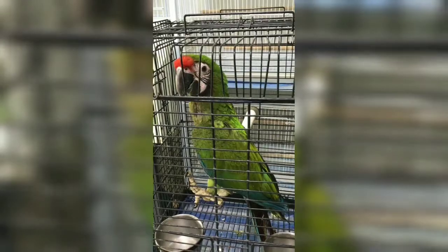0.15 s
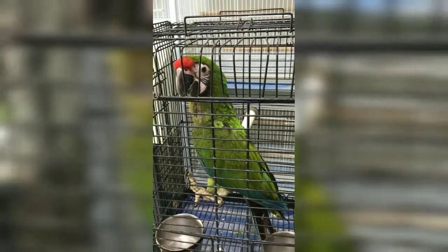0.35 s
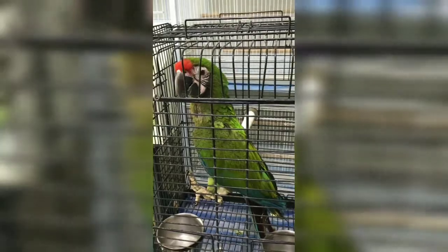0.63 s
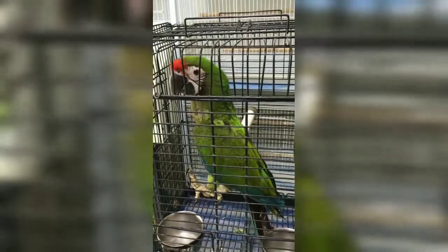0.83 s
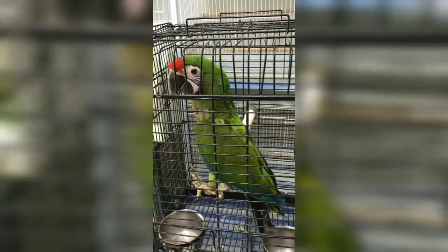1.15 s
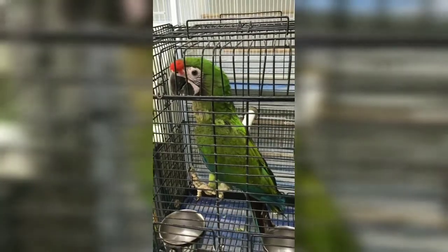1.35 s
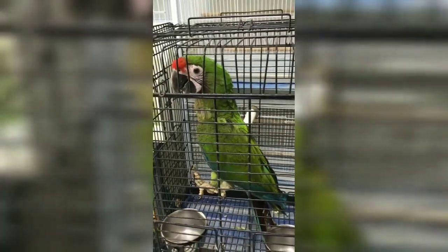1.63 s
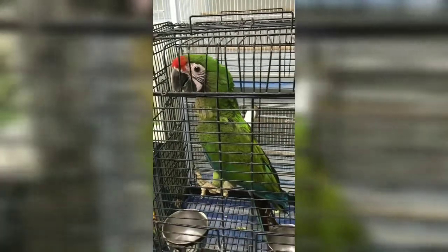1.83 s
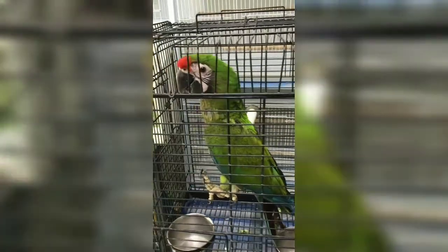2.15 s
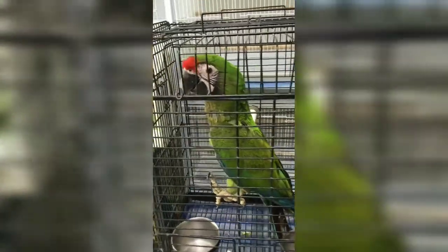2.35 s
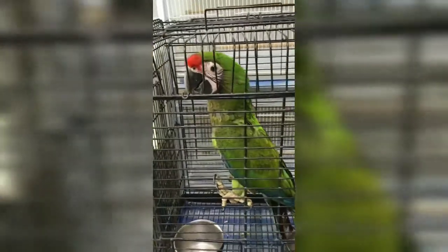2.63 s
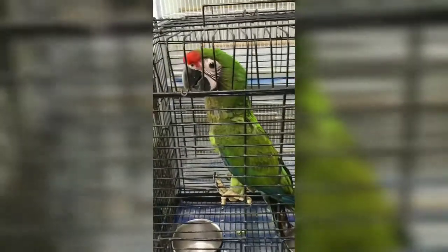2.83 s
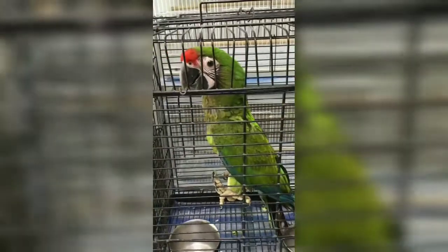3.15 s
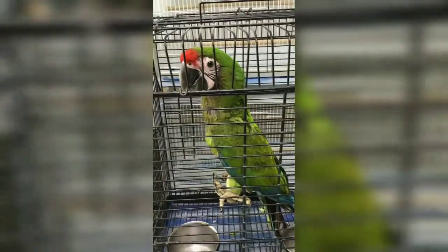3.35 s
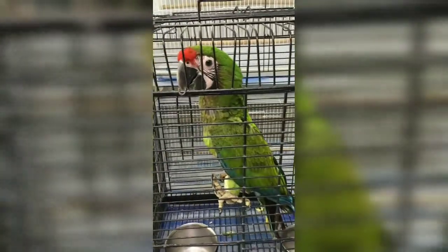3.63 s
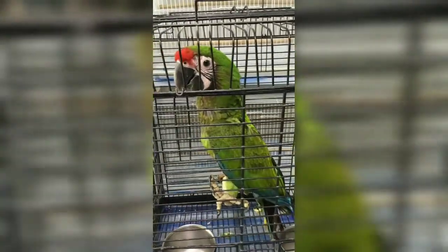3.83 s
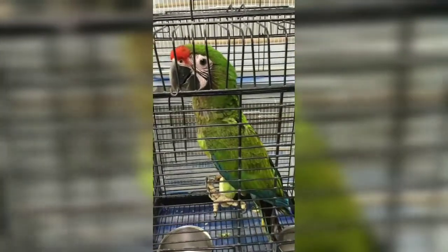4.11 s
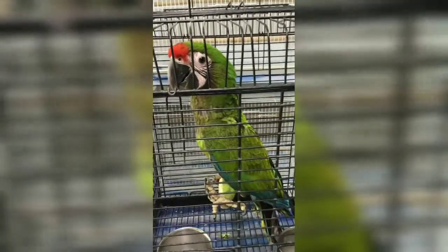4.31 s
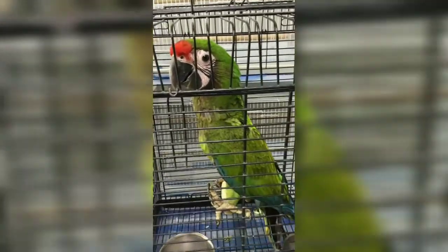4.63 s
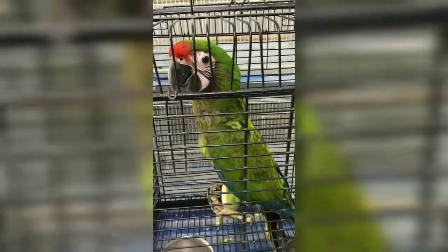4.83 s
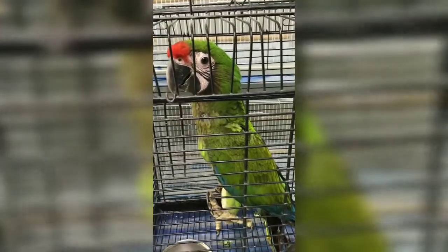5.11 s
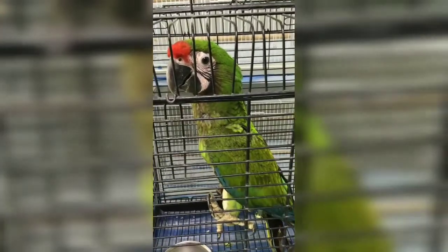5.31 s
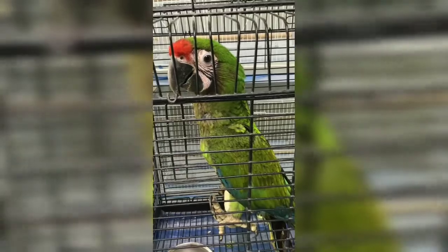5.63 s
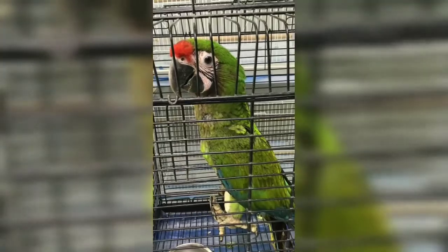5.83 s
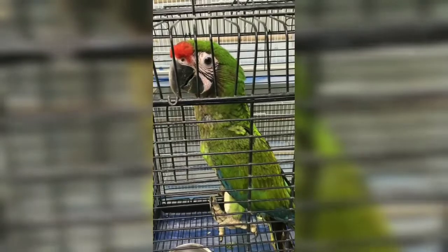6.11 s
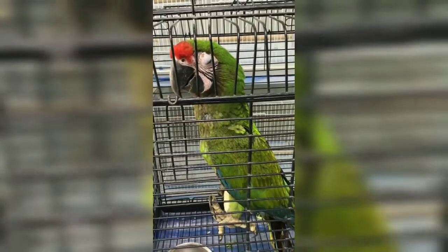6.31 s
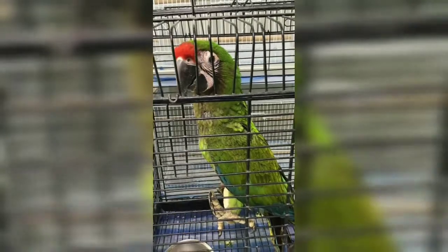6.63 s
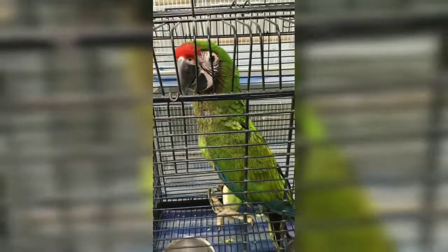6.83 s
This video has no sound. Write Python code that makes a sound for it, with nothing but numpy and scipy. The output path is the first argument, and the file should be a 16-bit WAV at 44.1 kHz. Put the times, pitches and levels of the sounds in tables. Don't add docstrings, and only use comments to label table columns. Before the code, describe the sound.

Piercing, raspy parrot screeches overlap with rough lower squawks in an echoing aviary room, with beating motor hum and soft bumps against the microphone.

```python
import sys
import numpy as np
from scipy import signal
from scipy.fft import rfft, irfft, next_fast_len
from scipy.io import wavfile
from scipy.ndimage import uniform_filter1d, map_coordinates

SR = 44100
rng = np.random.default_rng(int(sys.argv[2]) if len(sys.argv) > 2 else 0)


def rack_gain(trim_db):
    fader = np.asarray(trim_db, float)
    return 10 ** (fader / 20)


def wav_record(signal):
    frames = np.transpose(np.atleast_2d(signal))
    bounded = np.clip(frames, -1, 1)
    quanta = np.round(bounded * 32767).astype(np.int16)
    wavfile.write(sys.argv[1], SR, quanta)


N = 306936


def unit(x):
    return x / np.sqrt(np.mean(x ** 2) + 1e-20)


def curves(rows):
    seconds, *columns = np.transpose(rows)
    return [np.interp(np.arange(N) / SR, seconds, column) for column in columns]


def along(points, hz):
    point_hz, value = np.transpose(points)
    return np.interp(np.log(hz + 1), np.log(point_hz + 1), value)


def wobble(rate):
    coarse = np.arange(0, N + 16, 8)
    knots = rng.standard_normal(int(N * rate / SR) + 4)
    return np.interp(np.arange(N), coarse, map_coordinates(knots, [coarse * rate / SR]))


def coloured(x, spectrum):
    size = next_fast_len(len(x) + 8192)
    gain = rack_gain(along(spectrum, np.fft.rfftfreq(size, 1 / SR)))
    return unit(irfft(rfft(x, size) * gain, size)[:len(x)])


def mixed(clear, breath, share):
    share = np.clip(share, 0, 1)
    return np.sqrt(1 - share) * clear + np.sqrt(share) * breath


# multiple of the turning rate, first motor in dB, second motor in dB.
HUM = [(1, -44, -47.5), (2, -59.5, -51.5), (3, -58, -113), (4, -69, -86.5), (5, -76, -76)]
# pitch in Hz, level in dB, two limits
# in seconds (from, to).
WHINE = [(12575, -68, 6.265, 5.9), (13954, -87, 7.8, 4.8)]
# frequency in Hz, density in dB per Hz.
AIR = [(20, -55), (60, -5.5), (100, 7.5), (150, -7.5), (300, -9.5), (700, -10), (1400, -14), (2500, -7),
       (6000, -14), (10000, -56), (15600, -28)]


def fans():
    t = np.arange(N) / SR
    hz, beat_hz, together_s = 97.5, .518, 2.1
    spin = 2 * np.pi * hz * t + 0.43 * wobble(12)
    slip = 2 * np.pi * beat_hz * (t - together_s)
    hum = np.zeros(N)
    for k, first_db, second_db in HUM:
        pair = rack_gain(first_db) * np.sin(k * spin) + rack_gain(second_db) * np.sin(k * (spin - slip))
        hum += rack_gain(0.13 * wobble(1.81)) * pair * np.sqrt(2)
    whine = np.zeros(N)
    for whine_hz, db, from_s, to_s in WHINE:
        tone = np.sin(2 * np.pi * whine_hz * t) * (t > from_s) * (t < to_s)
        whine += rack_gain(db + 3.6 * wobble(9)) * tone
    gusts_db = 1.6 * wobble(5)
    return hum + whine + rack_gain(-45.5 + gusts_db) * coloured(rng.standard_normal(N), AIR)


# centre in seconds, level in dB, pitch in Hz, half length in seconds.
PEEPS = [
    (6.45, -38.5, 1010, 0.012),
    (6.494, -45, 1580, 0.052),
]


def peeps():
    t = np.arange(N) / SR
    out = np.zeros(N)
    for s, db, hz, half_s in PEEPS:
        out += rack_gain(db) * np.sin(2 * np.pi * hz * t) * np.exp(-2 * ((t - s) / half_s) ** 2)
    return out


# centre in seconds, level in dB, half length in seconds, low edge in Hz, top edge in Hz.
BUMPS = [(1.773, -39.5, 0.041, 70.2, 510), (1.913, -50, 0.1, 60, 201), (2.05, -29.5, 0.017, 44.46, 475),
         (2.143, -21.5, 0.033, 49.73, 490), (2.19, -28, 0.023, 45.7, 303),
         (3.089, -36.5, 0.1, 120.2, 552.2), (3.25, -43.5, 0.24, 150, 682), (3.602, -50, 0.086, 295.6, 697),
         (4.052, -41, 0.06, 69.8, 347), (5.048, -48, 0.11, 51.5, 202.6),
         (5.308, -33.5, 0.024, 60.16, 279.8), (5.702, -50, .08, 150, 349)]


def bumps():
    out = np.zeros(N)
    t = np.arange(-SR // 4, SR // 4) / SR
    for s, db, half_s, low_hz, top_hz in BUMPS:
        thud = [(low_hz / 2.5, -34), (low_hz, 0), (top_hz, -6), (top_hz * 3.8, -40)]
        lump = coloured(rng.standard_normal(len(t)), thud)
        out[round(s * SR) - SR // 4:][:len(t)] += rack_gain(db) * lump * np.exp(-2 * (t / half_s) ** 2)
    return out


# frequency in Hz, time to fall 60 dB in seconds.
ROOM = [(300, 0.3), (2000, 0.54), (5000, 0.49), (8000, 0.062), (15000, 0.15)]


def room(x):
    hz, t, z = signal.stft(rng.standard_normal(SR), SR, nperseg=256)
    fading = z * rack_gain(-60 * t / along(ROOM, hz)[:, None])
    tail = signal.istft(fading, SR, nperseg=256)[1]
    return signal.fftconvolve(np.pad(x, (350, 0)), tail / np.linalg.norm(tail))[:N]


def call_levels(calls, build_db, drop_db, knee_db, linger_db):
    attack_s, attack_db = .04, 15
    t = np.arange(0, N + 64, 64) / SR
    s, held_s, db = np.transpose(calls)[:3, :, None]
    after = np.maximum(t - s - held_s, 0)
    jump_db = attack_db * np.maximum(1 - (t - s) / attack_s, 0) ** 2
    rise_db = build_db * np.maximum(s + held_s - t, 0)
    fall_db = np.minimum(drop_db * after, knee_db + linger_db * after)
    below_db = jump_db + rise_db + fall_db
    return np.interp(np.arange(N) / SR, t, np.max(db - below_db, axis=0))


# start in seconds, held time in seconds, level in dB.
RASPS = [(.25, 0.14, -52), (.47, 0.11, -52.5), (.6, 0.26, -34.5), (.775, 0.15, -31), (1.015, 0.066, -34.5),
         (1.285, 0.1, -35), (1.47, 0.071, -36.5), (1.755, 0.11, -27.5), (1.96, 0.2, -33),
         (2.28, 0.15, -39.5), (2.55, .1, -35.5), (2.72, 0.088, -35.5), (2.945, 0.088, -30),
         (3.12, 0.13, -35), (3.39, 0.026, -48.5), (3.715, 0.2, -32), (3.97, 0.13, -35),
         (4.385, 0.086, -34.5), (4.53, .06, -26.5), (4.68, 0.068, -35), (4.925, 0.2, -26.5),
         (5.25, 0.12, -35), (5.51, 0.21, -32.5), (5.99, 0.24, -36), (6.265, 0.04, -32.5),
         (6.515, 0.14, -31), (6.885, 0.066, -39)]
# frequency in Hz, density in dB per Hz.
RASP = [(5200, -16.5), (6200, 5), (6500, -9), (6770, -7), (7250, 1), (7640, 2.5), (8700, -1.5), (9000, -3),
        (11800, -14.5), (12200, -20), (13900, -20), (15600, -27.5)]


def rasps(gap_db):
    level_db = call_levels(RASPS, build_db=33, drop_db=119, knee_db=6, linger_db=66)
    flutter = rack_gain(0.91 * wobble(150) + 0.96 * wobble(10))
    return rack_gain(level_db + gap_db) * coloured(rng.standard_normal(N) * flutter, RASP)


# start in seconds, held time in seconds, level in dB, top pitch in Hz, end pitch in Hz.
PURE_CALLS = [
    (.26, 0.039, -22, 1823, 1835),
]
CLEAR_CALLS = [(1.015, 0.066, -19, 1835, 1836), (1.285, 0.12, -18, 1969, 1975),
               (3.22, 0.057, -20.5, 2110, 2110), (4.55, .05, -18.5, 2098, 2110),
               (5.218, 0.18, -21, 2024, 2030)]
SHRILL_CALLS = [(.775, 0.12, -19, 2083, 1921), (1.755, 0.072, -14.5, 2140, 1975),
                (2.74, 0.067, -19.5, 2043, 1940), (2.945, 0.1, -18, 2095, 2031),
                (3.715, 0.17, -15, 2174, 2162), (4, 0.1, -21, 2081, 2006), (4.219, .05, -26, 2137, 2164),
                (4.925, 0.16, -13.5, 2200, 2059), (5.509, .1, -22, 2164, 2035),
                (6, 0.13, -17.5, 2103, 2149), (6.25, 0.05, -20.5, 2112, 1615),
                (6.51, 0.14, -16.5, 2283, 2163), (6.875, 0.074, -24.5, 1885, 2000)]
HOARSE_CALLS = [(.52, 0.052, -42, 1699, 1700), (.6, 0.14, -26, 1950, 1866),
                (2.259, 0.17, -26.5, 1948, 1900), (2.42, 0.13, -22.5, 1927, 1891),
                (2.6, 0.21, -21, 2061, 2046), (3.1, 0.12, -18.5, 2101, 2135),
                (4.385, 0.18, -22, 2170, 2170), (5.72, 0.11, -31.5, 1974, 1949),
                (6.14, 0.098, -22, 2200, 2180), (6.43, 0.11, -23.5, 2183, 2074)]
RAGGED_CALLS = [(2, 0.089, -23.5, 2180, 2119), (4.68, .12, -27.5, 1786, 1744)]
SHAKE = [.13, .18, .32, .5, .9]
SCOOP = [.95, .91, .94, .95, .98]
HALF_DB = [-23, -3, -7, -10, -3.5]
LOW_DB = [13.6, 9.2, 11.5, 14.5, 8.8]
HIGH_DB = [12.7, 14.3, 12.2, 16.3, 17.2]
BREATH = [.03, .05, .08, .15, .25]


def note_curves():
    kinds = [PURE_CALLS, CLEAR_CALLS, SHRILL_CALLS, HOARSE_CALLS, RAGGED_CALLS]
    calls = sorted((*call, kind) for kind, table in enumerate(kinds) for call in table)
    followers = calls[1:] + [(N / SR + 1, 0)]
    rows = []
    for (s, _, _, top_hz, end_hz, kind), (end, *_, next_kind) in zip(calls, followers):
        colour = [table[kind] for table in (SHAKE, HALF_DB, LOW_DB, HIGH_DB, BREATH)]
        gap_db = -70 * (1 - SCOOP[next_kind])
        rows.append((s, top_hz * SCOOP[kind], 0, *colour))
        rows.append((s + .035, top_hz, 0, *colour))
        rows.append((end - .03, end_hz, 0, *colour))
        rows.append((end - .004, end_hz, gap_db, *colour))
    return curves(rows) + [call_levels(calls, build_db=37, drop_db=168, knee_db=12, linger_db=79)]


# multiple of the pitch, level in dB.
SCREECH_PARTS = [(1, -11.5), (1.5, -9), (2, -2), (2.5, -12), (3, -14), (3.5, -25.5), (4, -27.5), (4.5, -19),
                 (5, -28), (6, -35), (7, -36)]
# frequency in Hz, density in dB per Hz.
SMALL_THROAT = [(900, -76), (1500, -15), (2050, -5.5), (2650, -9), (3200, 3), (4200, 1.5), (5200, 5.5),
                (6100, -11), (6600, -48), (8000, -50)]


def screeches(hz, gap_db, shake, half_db, low_db, high_db, breath, voice_db):
    shaken_hz = hz * (1 + shake * (.05 * wobble(240) + .03 * wobble(45)))
    turn = 2 * np.pi * np.cumsum(shaken_hz) / SR
    whistle = np.zeros(N)
    for k, db in SCREECH_PARTS:
        lift_db = half_db * (k % 1 > 0) + (low_db - 12) * (k < 1.7) + (high_db - 12) * (k > 2.2)
        line = rack_gain(db + lift_db + (3.0 + 3.0 * shake) * wobble(150))
        slip = 2.6 * shake * wobble(330)
        whistle += line * np.sin(k * turn + slip)
    flutter = rack_gain(2.3 * wobble(130) + 0.82 * wobble(18))
    air = coloured(rng.standard_normal(N), SMALL_THROAT)
    return rack_gain(voice_db + gap_db) * unit(flutter) * mixed(whistle, air, breath)


def small_parrots():
    hz, gap_db, *voice = note_curves()
    return screeches(hz, gap_db, *voice), rasps(gap_db)


# full voice from in seconds, held time in seconds, level in dB, pitch in Hz,
# breath share from 0 to 1.
SQUAWKS = [(.1, .12, -46.5, 488.4, 0.08), (1.6, 0.041, -46, 440.5, 0.82), (1.745, .035, -32.5, 375.8, 0.68),
           (1.975, 0.049, -27.5, 600, 0.44), (2.06, 0.092, -27, 519.8, .3),
           (3.04, 0.049, -37.5, 612.3, 0.98), (3.66, .04, -39, 538.5, 1), (3.81, 0.057, -29.5, 549.5, 0.86),
           (3.92, .13, -25.5, 599.5, 0.49), (4.1, 0.058, -30, 488.8, .5), (4.26, 0.042, -36, 516.5, 0.8),
           (4.47, 0.049, -36, 533, 0.71), (5.12, .04, -29, 519.5, 0.56), (5.2, .11, -23.5, 651, .48),
           (5.37, 0.058, -30, 455.8, 0.77), (5.59, .11, -25.5, 618.6, .52)]


def squawk_curves():
    swell_db_per_s, fade_db_per_s, quiet_db = 110, 120, -69
    sag_per_s, wander = 1.1, .1
    t = np.arange(0, N + 64, 64) / SR
    s, held_s, db, hz, breath = np.transpose(SQUAWKS)[:, :, None]
    below_db = swell_db_per_s * np.maximum(s - t, 0) + fade_db_per_s * np.maximum(t - s - held_s, 0)
    pitch = hz * (1 - sag_per_s * breath * np.clip(t - s - held_s / 2, -.2, .2))
    breath = np.clip(breath + .012 * below_db, 0, 1)
    open_db = 22 - 16.5 * breath - .12 * np.minimum(below_db, 20)
    lead = np.argmax(db - below_db, axis=0), np.arange(len(t))
    level_db = np.maximum((db - below_db)[lead], quiet_db)
    led = uniform_filter1d([pitch[lead], level_db, open_db[lead], breath[lead]], size=9, axis=1)
    hz, level_db, open_db, breath = curves(np.transpose([t, *led]))
    hz = hz * (1 + wander * np.minimum(breath, .55) * wobble(18))
    return hz, level_db, open_db, breath


# frequency in Hz, density in dB per Hz.
BIG_THROAT = [(180, -28), (300, -12.5), (489, -10.5), (625, -6), (819, -6), (955, -5.5), (1130, -5.5),
              (1910, -0.5), (3600, -6.5), (4140, -9), (6500, -20), (8450, -85), (14300, -120)]


def squawks():
    hz, level_db, open_db, breath = squawk_curves()
    turn = 2 * np.pi * np.cumsum(hz * (1 + .028 * wobble(150) + .025 * wobble(28))) / SR
    effort = np.clip((level_db + 48) / 18, 0, 1)
    pulses = np.zeros(N)
    for k in range(1, 14):
        pulses += rack_gain(4.5 * wobble(60) - effort * 11 / k) * np.cos(k * turn + 0.392 * k * k)
    air = rng.standard_normal(N) * (1 + 0.34 * np.cos(turn))
    flutter = rack_gain(3.2 * wobble(140) + 0.62 * wobble(20))
    voice = coloured(mixed(unit(pulses), unit(air), breath) * flutter, BIG_THROAT)
    low = signal.sosfilt(signal.butter(N=2, Wn=1800, fs=SR, output="sos"), voice)
    return rack_gain(level_db + 7.5) * (low + rack_gain(open_db - 12) * (voice - low))


def scene():
    screech, rasp = small_parrots()
    squawk = squawks()
    wet = room(rack_gain(-6.5) * screech + rack_gain(-6.0) * rasp) + room(rack_gain(-5) * squawk)
    birds = rack_gain(-4.0) * (screech + squawk) + rasp + wet + peeps()
    return (birds + fans() + bumps())[None]


def band_limit(x):
    return signal.sosfilt(signal.butter(12, 16510, fs=SR, output="sos"), x)


# time in seconds, gain in dB.
INPUT = [
    (0, -120),
    (.1962, -120),
    (.1966, 17),
    (.249, 17),
    (.251, 3),
    (.29, 17),
    (.381, 17),
    (.3825, 0),
    (7, 0),
]


def record(dry):
    x = dry * rack_gain(curves(INPUT)[0])
    x = x / (1 + np.abs(x / 1.17) ** 6) ** (1 / 6)
    x = irfft(rfft(x) * (np.fft.rfftfreq(N, 1 / SR) < 15600), N)
    return band_limit(x)


dry = scene()
out = record(dry)
wav_record(out)
```